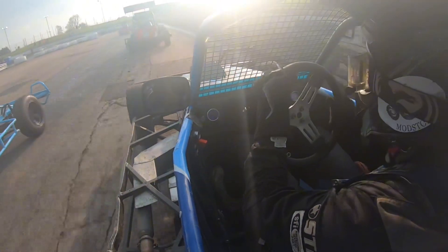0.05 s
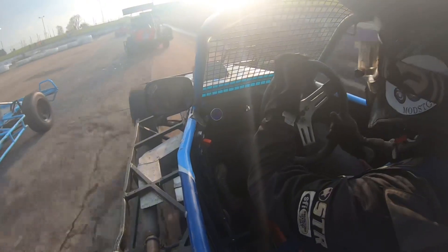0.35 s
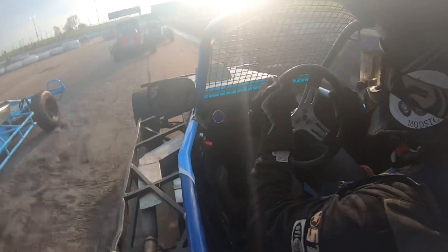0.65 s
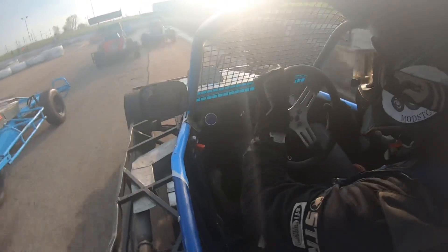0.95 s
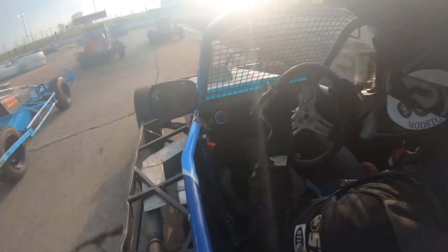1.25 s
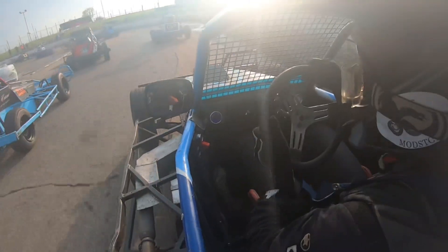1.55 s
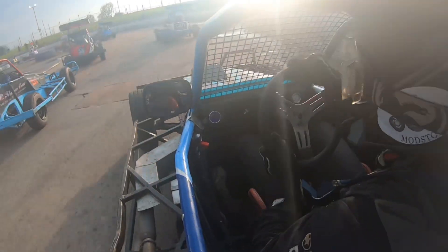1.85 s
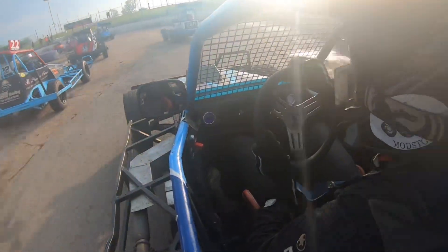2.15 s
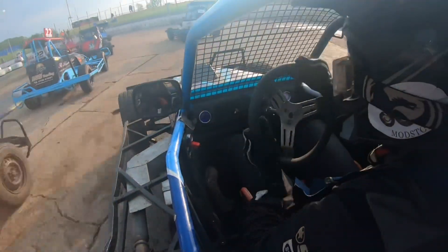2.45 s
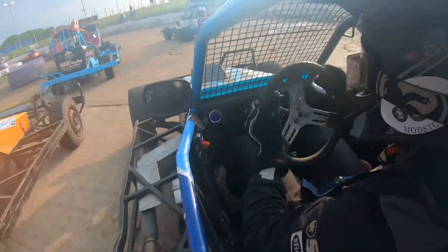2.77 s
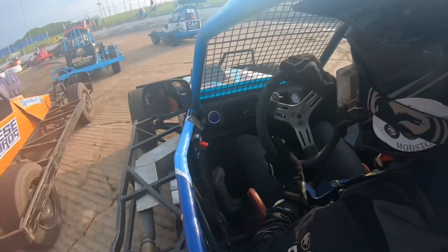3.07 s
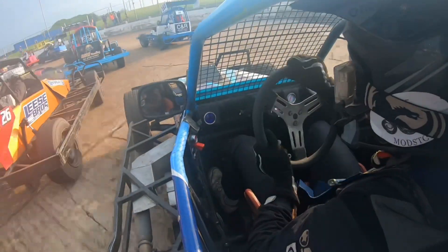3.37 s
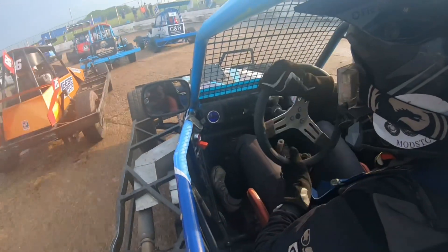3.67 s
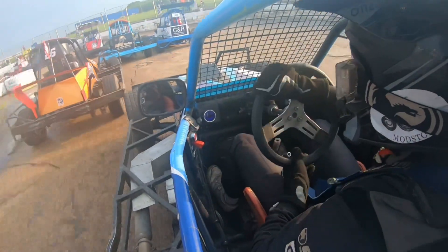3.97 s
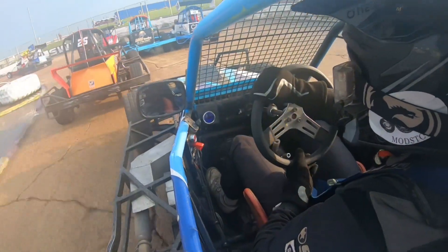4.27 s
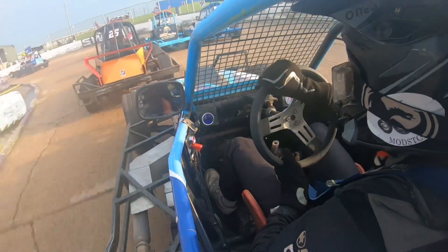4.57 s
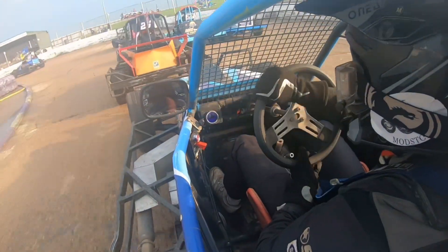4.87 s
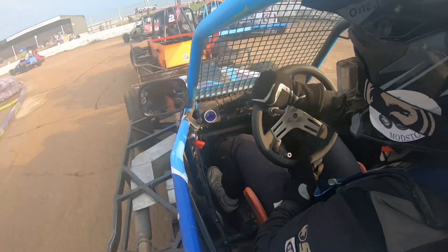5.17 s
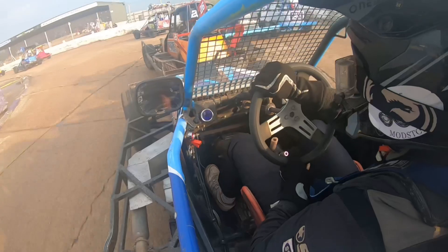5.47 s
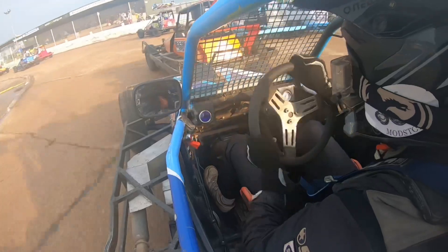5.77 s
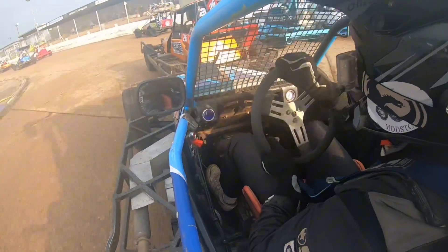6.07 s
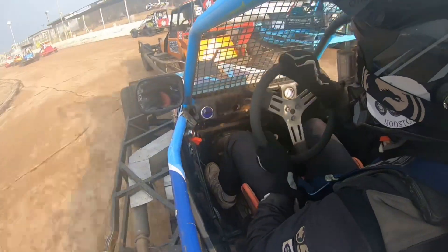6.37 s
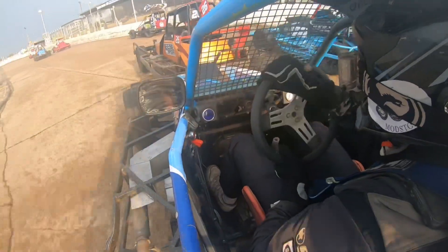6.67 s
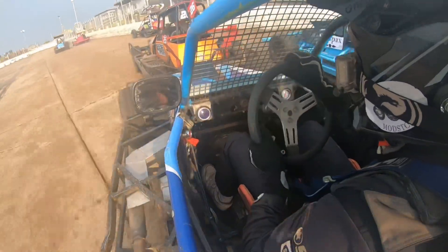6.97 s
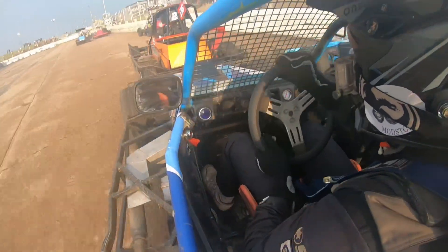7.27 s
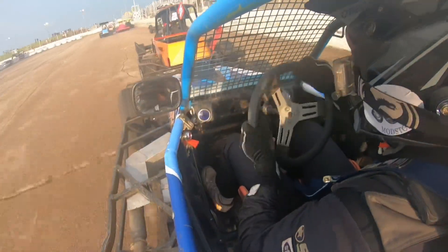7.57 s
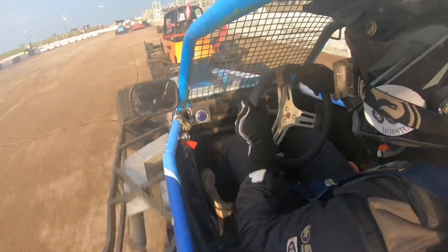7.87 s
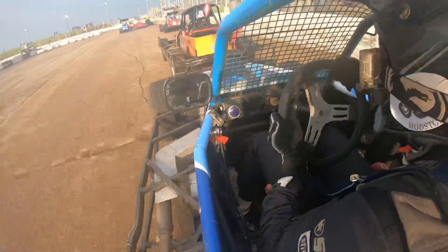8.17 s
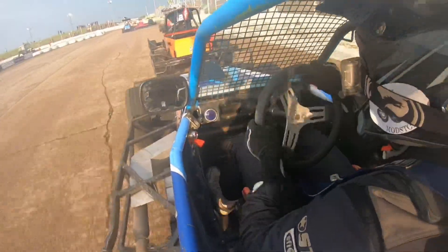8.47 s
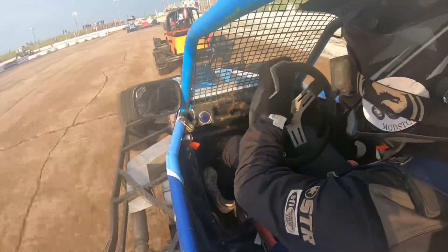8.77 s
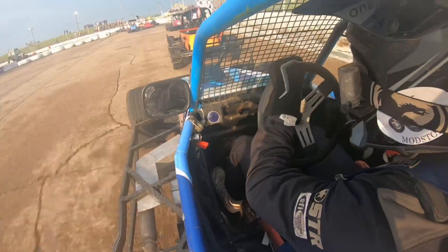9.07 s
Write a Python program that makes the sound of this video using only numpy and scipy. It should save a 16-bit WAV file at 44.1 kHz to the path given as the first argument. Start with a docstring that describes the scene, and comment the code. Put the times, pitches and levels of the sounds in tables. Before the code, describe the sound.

Heard from the open cockpit of a stock car racing on a dirt oval, a loud, snarling engine runs hard, falls in pitch through a corner and gradually pulls back up. The drones of a car alongside and another ahead swell and fade against it. Wind rumble, tyre hiss and thudding jolts run underneath, with a faint, rough tyre squeal as the car slows and occasional ticks of grit.

```python
"""A four-cylinder engine booms right at the microphone, on board an open-frame stock car on a dusty oval. It
sinks into a bend and pulls out again, its rasp and intake snarl pulsing with the firings. The exhausts of other
cars beat against it: one alongside, one just ahead, and for a while a third. Wind buffets the cage, jolts thump
the chassis, tyres hiss and squeal on the dirt and grit ticks on the frame."""
import sys
import numpy as np
from scipy import signal
from scipy.fft import rfft, irfft, next_fast_len
from scipy.io import wavfile
from scipy.ndimage import uniform_filter1d, minimum_filter1d

SR = 44100
rng = np.random.default_rng(int(sys.argv[2]) if len(sys.argv) > 2 else 0)


def inscribe(sig):
    """Save sig as 16-bit PCM at rate SR to the path in sys.argv[1].

    A 1-D sig is mono; a 2-D sig holds one channel per row.
    Samples are clipped to [-1, 1] before scaling.
    """
    pcm = np.round(np.clip(np.atleast_2d(sig).T, -1, 1) * 32767)
    wavfile.write(sys.argv[1], SR, pcm.astype(np.int16))


N = 402633

# our engine sinks into the bend and pulls out, flaring over bumps: (time [s], firing rate [Hz])
FIRING_RATE = [(0, 186), (.08, 189), (.28, 187.5), (.39, 195), (.46, 193.5), (.53, 201), (.62, 202),
               (.71, 196), (.8, 200.5), (.98, 196.5), (1.16, 184), (1.5, 173), (1.65, 180), (1.73, 172.5),
               (1.86, 175), (2, 171), (2.16, 180), (2.27, 160), (2.5, 166), (2.85, 157), (2.96, 159),
               (3.3, 147), (3.44, 140), (3.6, 142), (3.8, 135), (4.2, 137), (4.55, 134), (5.1, 133),
               (5.22, 130), (5.7, 131), (5.96, 134.5), (6.35, 137.3), (6.68, 141), (6.88, 146.3),
               (7.12, 147.3), (7.25, 151.3), (7.43, 150.7), (7.51, 155), (7.98, 159), (8.24, 163),
               (8.35, 169), (8.6, 165.5), (8.84, 169.5), (8.92, 174), (9.13, 179)]
# the driver lifts for the bend and feeds the power back in: (time [s], opening [0-1])
THROTTLE = [(0, 0.84), (.35, 1), (1.02, 0.95), (1.08, 0.55), (3.2, 0), (4.4, 0.18), (5.7, 0.45),
            (6.5, 0.69), (7.4, 0.66), (7.9, 0.83), (8.3, 0.81), (9.13, 0.92)]
# how hard the car works: (time [s], engine load [dB], relative tyre and air hiss [dB])
LOAD_AND_HISS = [(0.03, -20.5, -35), (0.71, -19, -30.5), (1.02, -19, -32), (1.09, -20.5, -34),
                 (1.25, -18.5, -33.5), (1.92, -19.5, -29.5), (3.34, -27, -35.5), (3.74, -24.5, -38),
                 (4.07, -20.5, -32.5), (4.6, -20, -38), (5.03, -24, -38.5), (5.16, -19.5, -35.5),
                 (5.28, -23, -37), (5.76, -20, -36), (6.24, -26.5, -36.5), (7.05, -25, -37),
                 (7.35, -28, -36.5), (7.75, -24.5, -35.5), (7.92, -27, -35.5), (8.04, -24, -33),
                 (8.25, -20, -34.5), (8.64, -20.5, -34.5), (9.1, -20.5, -33.5)]
# our exhaust's firing tone, heard from the cockpit: (time [s], level [dB])
BOOM_LEVEL = [(0, -9), (.28, -19.5), (1.1, -10.5), (1.34, -15.5), (1.5, -15), (2.2, -13.5), (2.65, -10),
              (3.33, -11), (3.52, -17.5), (4.2, -15), (4.75, -12), (5.07, -19), (5.3, -11.5), (6.6, -13.5),
              (7.85, -13.5), (8.16, -24), (8.48, -10.5), (9.13, -11.5)]
# exhaust resonance that the octave sweeps through: (centre [Hz], width [Hz], full-throttle lift [dB])
OCTAVE_MODE = [(289, 46, 17)]
# engine orders that stand out: (order [x firing rate], coasting level [dB], full-throttle level [dB])
STRONG_ORDERS = [(.5, -38, -29), (.75, -42, -33), (1.25, -39, -32), (1.5, -33, -32), (1.75, -45, -34),
                 (2.5, -47, -31.5), (3, -35, -32), (3.5, -49, -32), (3.75, -47, -41), (4, -37.5, -32.5),
                 (4.5, -46, -36), (5, -48, -34), (5.5, -52, -33.5), (6, -49, -35.5), (6.5, -54, -35.5),
                 (7, -47, -35.5), (7.5, -53, -42), (8, -49, -39), (8.5, -54, -44), (9, -53, -45)]

# resonances around the microphone: (centre [Hz], width [Hz], lift [dB])
BODY_MODES = [(78, 14, 3), (294, 30, 4), (400, 35, 4), (552, 26, 10), (705, 40, 4), (975, 60, 4.5),
              (1160, 70, 1.5), (1400, 160, 3.5)]  # the car's body, which the engines' overtones glide through
PANEL_MODES = [(580, 28, -1.5), (694, 21, -0.5), (1030, 140, 1), (1170, 23, 3.5), (1434, 16, 3),
               (1894, 230, 4), (2160, 150, 3), (2363, 130, 3), (2640, 150, 2.5), (2970, 150, 2),
               (3500, 160, 1.5), (4100, 85, 0), (4810, 220, -2)]  # the open cockpit's panels
CHASSIS_MODE = [(196, 170, 10)]  # the chassis ringing when jolted

# noise colours: (frequency [Hz], relative spectral density [dB])
RASP_COLOUR = [(30, -37.5), (200, -12.5), (350, 2), (550, 4), (780, -2), (1000, 0), (1250, -6.5),
               (1450, -4), (1700, -10), (2500, -20.5), (4500, -29), (6500, -40), (11000, -87)]
SNARL_COLOUR = [(300, -41.5), (900, -5.5), (1160, 12), (1350, 3), (1550, -6.5), (1750, 2), (2000, -20),
                (3000, -25.5), (7000, -78)]
VALVE_COLOUR = [(1200, -30), (1800, -1), (3200, -1), (4700, -7), (6000, -25), (9000, -55), (13000, -100)]
HISS_COLOUR = [(200, -32.5), (700, 0.5), (1400, 4.5), (1750, -1), (2100, 1.5), (2600, -0.5), (3300, 2),
               (4000, -1), (4800, -2), (5800, -14), (7000, -19.5), (8300, -31.5), (10000, -39.5),
               (12000, -60)]
TOP_HISS_COLOUR = [(5000, -38), (8000, -2), (10200, -2), (12000, -24), (15000, -37.5)]
WIND_COLOUR = [(20, 13), (45, 16), (80, 18), (110, 16), (200, 14), (500, -30), (4000, -100)]
CHASSIS_COLOUR = [(20, -30.5), (70, -2), (130, 12.5), (205, 15.5), (250, 12), (320, 7.5), (450, -25.5),
                  (900, -41), (5000, -100)]
GRIT_COLOUR = [(300, -32), (1500, -12), (3000, 13), (4600, 7), (5600, -3), (6800, -5.5), (8300, -15.5),
               (10200, -35), (12000, -53), (16000, -71)]

# other cars at close range; the first table holds the car alongside and, from about 6.4 to 7.3 s, a third car:
# (time [s], firing rate [Hz], relative level [dB])
NEAR_CARS = [(0, 157, -24.5), (.6, 191, -22), (1.0, 201, -19), (1.35, 198, -15.5), (1.55, 188, -23.5),
             (1.8, 200, -23), (2.05, 182, -16), (2.3, 189, -21.5), (3.0, 169, -19.5), (3.6, 150, -26),
             (4.1, 150, -20.5), (4.5, 163, -24.5), (5.3, 102, -37), (6.4, 120, -28.5), (7.25, 121, -22),
             (7.6, 160, -28), (7.95, 165, -15.5), (8.15, 188, -19.5), (8.4, 180, -26), (9.13, 185, -34)]
CAR_AHEAD = [(0, 153, -33.5), (1.2, 146, -34.5), (3.3, 144, -38), (3.8, 141, -28.5), (4.55, 139, -23.5),
             (4.85, 113, -17), (5.2, 129, -21.5), (5.75, 125, -20.5), (6.0, 131, -21), (6.25, 124, -16),
             (6.5, 132, -21.5), (7.0, 140, -18.5), (7.2, 144, -18.5), (7.4, 133, -17.5), (7.65, 138, -20),
             (7.85, 116, -21), (8.3, 122, -27), (9.13, 157, -40)]
# their overtones: (order [x firing rate], level against the firing tone [dB])
RIVAL_ORDERS = [(2.5, -25), (3, -22), (4, -20), (5, -28), (7, -31), (8, -28)]
# faint high hiss in the top treble: (time [s], level [dB])
TOP_HISS_LEVEL = [(0, -71), (2.5, -78), (3.3, -88.5), (5.3, -89), (5.9, -69), (9.13, -71)]
# steady rumble between jolts: (time [s], wind buffet [dB], drone of pack and chassis [dB])
RUMBLE = [(0, -26, -27.5), (.65, -26.5, -21), (2.1, -23, -28), (2.7, -29, -36), (3.3, -28.5, -31),
          (3.9, -20.5, -29), (5.1, -21, -23), (5.9, -24.5, -21), (6.7, -32, -21), (7.35, -41, -19),
          (8.3, -25, -20), (9.13, -28, -20.5)]
# jolts from the track: (time [s], low thump [dB], chassis ring [dB], dip of the exhaust boom [dB])
JOLTS = [(.42, -18.5, -29, -2.5), (.89, -24, -25.5, 4), (1.22, -22, -17, 11), (1.38, -27, -25, 3),
         (1.93, -21, -22.5, 5), (2.21, -17.5, -17, 3.5), (2.86, -33, -17, 10), (3.11, -23, -18.5, 5),
         (3.38, -25, -14.5, 0.5), (3.57, -21, -39, 2), (3.91, -20, -18.5, 1), (4.881, -15, -17, 2),
         (5.479, -17.5, -28, 7), (5.74, -21, -25, 6), (6.24, -23, -18.5, 5), (8.68, -30, -13, 5.5),
         (8.92, -23, -44, 1)]
# sprays of grit on the frame: (start [s], relative level [dB], decay time [s])
GRIT_SPRAYS = [(1.183, -43, .02), (1.289, -35, 0.0083), (1.497, -37, 0.016), (1.53, -45, .016),
               (1.809, -40, .012), (2.925, -32, 0.0058), (6.196, -58, .007), (7.959, -36, 0.013),
               (8.012, -40.5, .03), (8.104, -39, 0.013), (8.157, -38, .008), (8.222, -43, .022),
               (8.414, -40.5, 0.034), (8.556, -47, 0.01)]
# bursts of roar and rattle: (peak time [s], half length [s], centre [Hz], level [dB])
BURSTS = [(1.19, 0.017, 3950, -39), (1.995, 0.059, 540, -28), (2.216, 0.084, 483, -25.5),
          (4.04, 0.022, 3670, -38), (4.39, .02, 1000, -26), (5.145, .035, 3000, -35.5),
          (6.125, 0.014, 2100, -33.5), (6.75, .02, 2100, -33), (7.94, 0.085, 550, -27),
          (8.03, 0.078, 480, -27), (8.11, .025, 2200, -28.5), (8.139, 0.093, 370, -23.5),
          (8.175, 0.08, 1000, -28.5), (8.201, .15, 3950, -43)]
# tyres scrub sideways: (peak time [s], half length [s], pitch [Hz], level [dB], roughness [x pitch])
SLIDES = [(2.597, 1, 961, -33, .045), (4.102, .55, 1432, -35.5, .02)]


def from_db(db):
    """Decibels to gain."""
    return 10 ** (np.asarray(db) / 20)


def unit_power(x):
    """Scale to a mean square of 1."""
    return x / np.sqrt(np.mean(x ** 2) + 1e-20)


def in_time(rows):
    """Each column of a curve at every sample."""
    times, *columns = np.transpose(rows)
    return [np.interp(np.arange(N) / SR, times, column) for column in columns]


def lift(modes, hz):
    """Decibels that a set of resonances adds at each frequency."""
    return sum(db / (1 + (2 * (hz - centre) / width) ** 2) for centre, width, db in modes)


def swell(peak_s, half_length):
    """A smooth rise and fall of height 1."""
    return np.exp(-np.minimum(((np.arange(N) / SR - peak_s) / half_length) ** 2, 30))


def drift(rate_hz):
    """A random wander of spread 1 that changes about rate_hz times a second."""
    hop = 40
    pole = np.exp(-2 * np.pi * rate_hz * hop / SR)
    slow = signal.lfilter([1], [1, -2 * pole, pole * pole], rng.standard_normal(N // hop + 2002))[2000:]
    return np.interp(np.arange(N) / hop, np.arange(len(slow)), unit_power(slow))


def coloured_noise(colour, modes=(), source=None):
    """Noise (or a given source) shaped by a colour and resonances, at unit power."""
    size = next_fast_len(N)
    hz = np.maximum(np.fft.rfftfreq(size, 1 / SR), 1)
    points_hz, points_db = np.transpose(colour)
    colour_db = np.interp(np.log(hz), np.log(points_hz), points_db)
    subsonic_cut = hz ** 2 / (hz ** 2 + 18 ** 2)
    gain = from_db(colour_db + lift(modes, hz)) * subsonic_cut
    white = rng.standard_normal(size) if source is None else source
    return unit_power(irfft(rfft(white, size) * gain, size)[:N])


def wobbling_phase(hz, wobble, wobble_hz):
    """Phase in radians of a cycle whose speed wobbles as the car bumps along."""
    return 2 * np.pi * np.cumsum(hz * (1 + wobble * drift(wobble_hz))) / SR


def puffs(phase, depth, limp):
    """Gas moves in one puff per firing, with one cylinder of the four stronger than the others."""
    return unit_power(np.exp(depth * np.cos(phase) + limp * np.cos(phase / 4)))


def cycle_rattle(phase, size=1024):
    """A rattle that recurs on every cycle of four firings, its pattern slowly changing."""
    cycle = phase / (8 * np.pi)
    places = np.arange(size) / size
    patterns = (drift(6) * np.interp(cycle, places, rng.standard_normal(size), period=1)
                for _ in range(4))
    return unit_power(sum(patterns))


def exhaust_tone(phase, level_db, flutter_db, sway):
    """One low tone of our exhaust, fluttering as the car shakes."""
    return np.sqrt(2) * from_db(level_db + flutter_db * drift(15)) * np.sin(phase + sway * drift(6.6))


def exhaust_boom(phase, firing_hz, throttle, dip_db):
    """The firing tone and its octave, which resonates on an open throttle and burbles on a shut one."""
    boom_db, = in_time(BOOM_LEVEL)
    boom = exhaust_tone(phase, boom_db - dip_db, flutter_db=1.17, sway=.061)
    octave_db = -36 + 5.5 * throttle + np.sqrt(throttle) * lift(OCTAVE_MODE, 2 * firing_hz)
    return boom + exhaust_tone(2 * phase, octave_db, flutter_db=3.5 - throttle, sway=.099)


def exhaust_overtones(phase, firing_hz, throttle, load_db):
    """Four unequal cylinders put lines at quarters of the firing rate; they glide through body modes."""
    strong = {order: levels for order, *levels in STRONG_ORDERS}
    out = np.zeros(N)
    for quarters in [2, 3, 5, 6, 7, *range(9, 45)]:
        order = quarters / 4
        weak_db = -43 - order
        shut_db, open_db = strong.get(order, (weak_db - 4, weak_db))
        level_db = shut_db + (open_db - shut_db) * throttle + lift(BODY_MODES, firing_hz * order)
        if order > 2:  # the upper lines swell with the load
            level_db += .42 * (load_db + 15)
        # uneven burning smears the high lines most
        smear = .03 * order * drift(9) + rng.uniform(0, 2 * np.pi)
        out += from_db(level_db + 1.8 * drift(6)) * np.sin(phase * order + smear)
    return np.sqrt(2) * out


def exhaust_rasp(phase, load_db):
    """Rough noise that follows the load, with bursts on top, all pulsing at the firing rate."""
    rasp = from_db(load_db - 3) * coloured_noise(RASP_COLOUR, PANEL_MODES)
    return (rasp + roar_bursts()) * puffs(phase, depth=.3, limp=.07)


def intake_snarl(phase, throttle, recurring_share=.35):
    """The intake gulps air once per firing, louder as the throttle opens."""
    gulps = np.sqrt(recurring_share) * cycle_rattle(phase)
    gulps += np.sqrt(1 - recurring_share) * rng.standard_normal(N)
    level = from_db(-26 - 29.5 * (1 - throttle))
    return level * coloured_noise(SNARL_COLOUR, source=gulps) * puffs(phase, depth=.82, limp=.083)


def valve_clatter(phase, load_db):
    """The valves rattle on each engine cycle, coloured by the cockpit's panels."""
    return from_db(load_db - 15) * coloured_noise(VALVE_COLOUR, PANEL_MODES, source=cycle_rattle(phase))


def own_engine(dip_db):
    """Right at the microphone: exhaust, intake and valves, all timed by one crank."""
    firing_hz, = in_time(FIRING_RATE)
    throttle, = in_time(THROTTLE)
    load_db, _ = in_time(LOAD_AND_HISS)
    phase = wobbling_phase(firing_hz, wobble=.003, wobble_hz=14.5)
    exhaust = exhaust_boom(phase, firing_hz, throttle, dip_db)
    exhaust += exhaust_overtones(phase, firing_hz, throttle, load_db)
    exhaust += exhaust_rasp(phase, load_db)
    return exhaust + intake_snarl(phase, throttle) + valve_clatter(phase, load_db)


def rival_exhaust(car, octave_db, flutter_db):
    """Another car's firing tone and overtones fade and swell with the changing path to the microphone."""
    firing_hz, level_db = in_time(car)
    phase = wobbling_phase(firing_hz, wobble=.005, wobble_hz=7)
    out = np.sin(phase) * from_db(flutter_db * drift(13))
    for order, db in [(2, octave_db), *RIVAL_ORDERS]:
        overtone_db = db + lift(BODY_MODES, order * firing_hz) + flutter_db * drift(11)
        out += from_db(overtone_db) * np.sin(order * phase)
    return np.sqrt(2) * from_db(level_db + .2) * out


def tyre_hiss():
    """Tyres and air hiss into the open cockpit; a faint high hiss sits above them in the top treble."""
    _, hiss_db = in_time(LOAD_AND_HISS)
    top_db, = in_time(TOP_HISS_LEVEL)
    hiss = from_db(hiss_db + 2 + drift(30)) * coloured_noise(HISS_COLOUR, PANEL_MODES)
    return hiss + from_db(top_db) * coloured_noise(TOP_HISS_COLOUR)


def wind_buffet(thump):
    """Air buffets the cage around the microphone, harder at each jolt."""
    wind_db, _ = in_time(RUMBLE)
    return np.hypot(from_db(wind_db + .36 * drift(9.3)), thump) * coloured_noise(WIND_COLOUR)


def chassis_drone(ring):
    """The pack and the chassis drone, and the chassis rings at each jolt."""
    _, drone_db = in_time(RUMBLE)
    drone = from_db(drone_db + .9 * drift(15)) * coloured_noise(CHASSIS_COLOUR)
    return drone + ring * coloured_noise(CHASSIS_COLOUR, CHASSIS_MODE)


def jolts():
    """Each jolt thumps, shakes the chassis and briefly shifts the boom: two gains and a dip in dB."""
    thump, ring, dip_db = np.zeros((3, N))
    for peak_s, thump_db, ring_db, depth_db in JOLTS:
        shape = swell(peak_s, half_length=.061)
        thump += from_db(thump_db) * shape
        ring += from_db(ring_db) * shape
        dip_db += depth_db * shape
    return thump, ring, dip_db


def grit(rise_s=.0015):
    """Each spray is a short, dying shower of dry grains on the panels and frame close by."""
    shower = np.zeros(N)
    for start_s, db, decay_s in GRIT_SPRAYS:
        start = round(start_s * SR)
        age = np.arange(N - start) / SR
        shower[start:] += from_db(db) * (1 - np.exp(-age / rise_s)) * np.exp(-age / decay_s)
    grains = from_db(8 - 4 * drift(200))
    return shower * grains * coloured_noise(GRIT_COLOUR)


def roar_bursts(half_width_octaves=.32):
    """Brief swells of rough roar, each in a band of its own."""
    out = np.zeros(N)
    for peak_s, half_length, hz, db in BURSTS:
        band = [(hz * 2 ** (k * half_width_octaves), -3 * k * k) for k in range(-6, 7)]
        out += from_db(db) * swell(peak_s, half_length) * coloured_noise(band)
    return out


def tyre_squeal():
    """Rubber sticks and slips in the bend: a rough, wavering tone for each slide."""
    out = np.zeros(N)
    for peak_s, half_length, hz, db, roughness in SLIDES:
        wavering_hz = hz * (1 + .011 * drift(8))
        phase = wobbling_phase(wavering_hz, wobble=roughness, wobble_hz=70)
        out += from_db(db) * swell(peak_s, half_length) * np.sin(phase)
    return np.sqrt(2) * out


def scene():
    """One microphone in the cockpit: our engine, the cars around it, and the rush of air and dirt."""
    thump, ring, dip_db = jolts()
    near = rival_exhaust(NEAR_CARS, octave_db=-18, flutter_db=3.5)
    ahead = rival_exhaust(CAR_AHEAD, octave_db=-5, flutter_db=0)
    engines = own_engine(dip_db) + near + ahead
    track = tyre_hiss() + tyre_squeal() + wind_buffet(thump) + chassis_drone(ring) + grit()
    return (engines + track)[None]


def limiter(x, ceiling_db, release_db_per_s):
    """Looks a little ahead, ducks the peaks and recovers at a steady rate."""
    over_db = np.maximum(20 * np.log10(np.abs(x) + 1e-9) - ceiling_db, 0)
    ramp_db = release_db_per_s * np.arange(N) / SR
    duck_db = ramp_db - np.maximum.accumulate(over_db + ramp_db, axis=-1)
    early_db = minimum_filter1d(duck_db, size=161)
    return x * from_db(uniform_filter1d(early_db, size=161))


def record(dry):
    """The on-board camera limits the peaks and cuts the top above 15 kHz."""
    held = limiter(dry, ceiling_db=-1.9, release_db_per_s=120)
    return signal.sosfilt(signal.butter(12, 15000, fs=SR, output="sos"), held)


dry = scene()
out = record(dry)
inscribe(out)
```